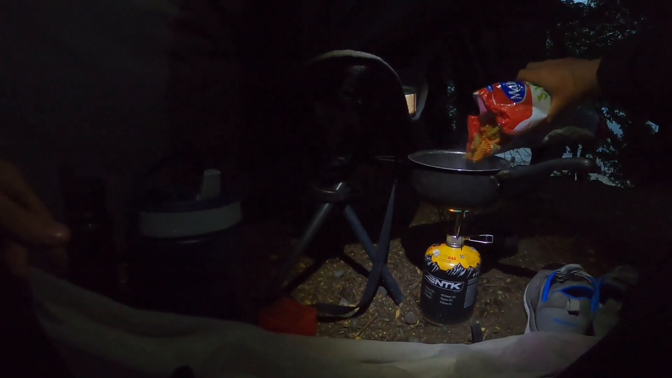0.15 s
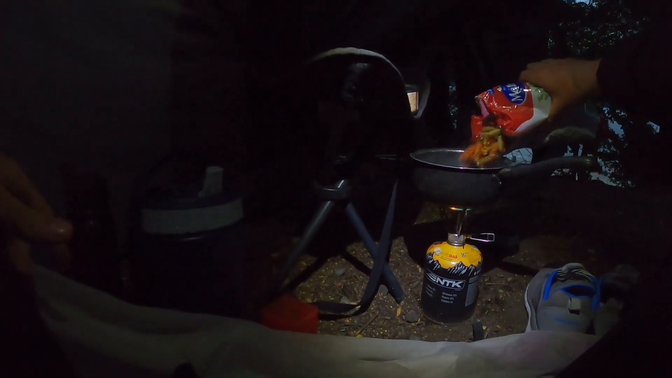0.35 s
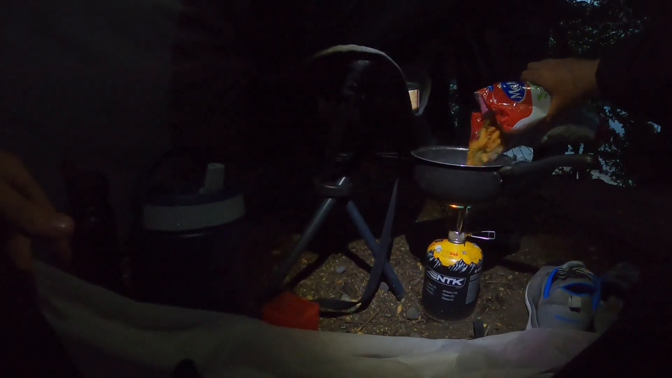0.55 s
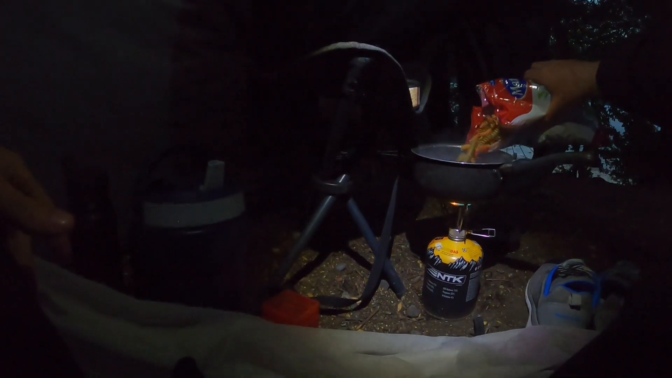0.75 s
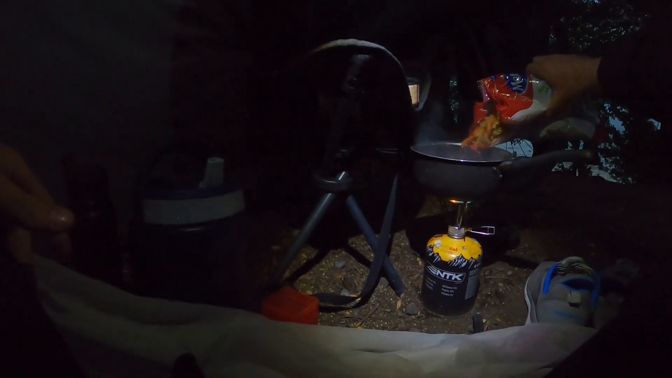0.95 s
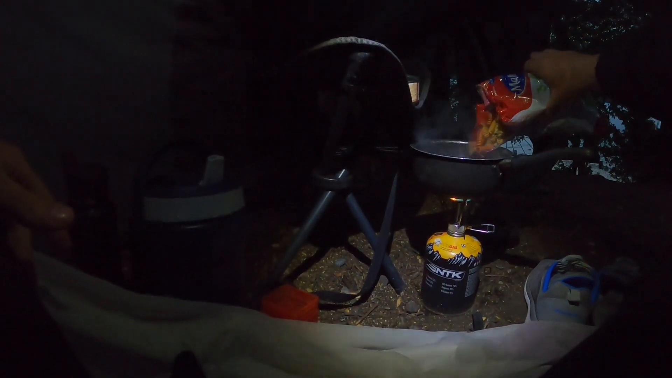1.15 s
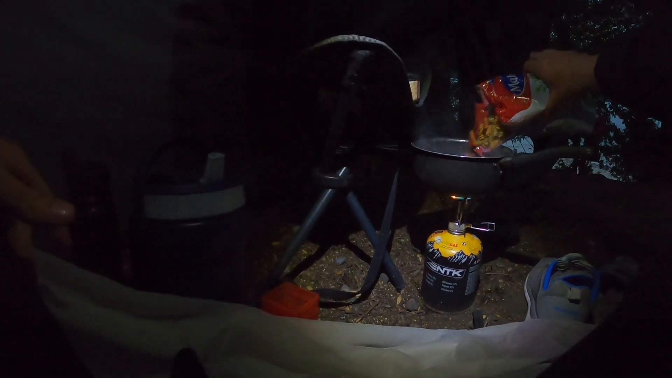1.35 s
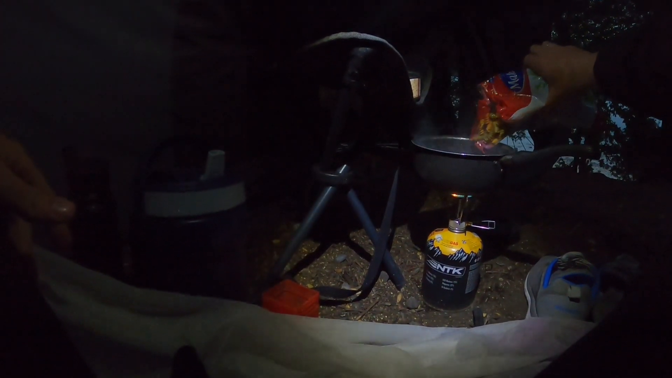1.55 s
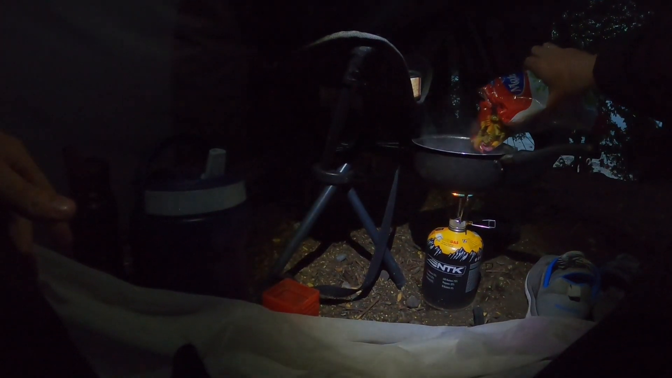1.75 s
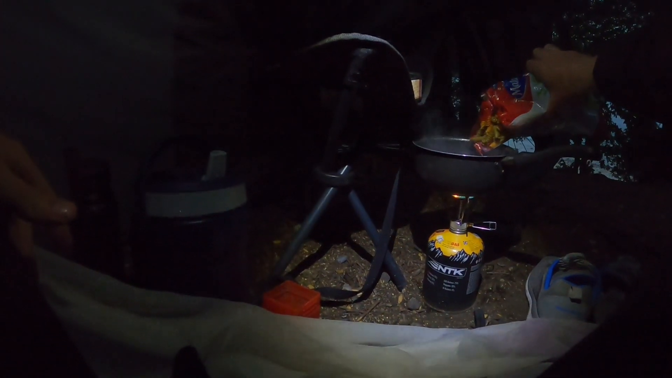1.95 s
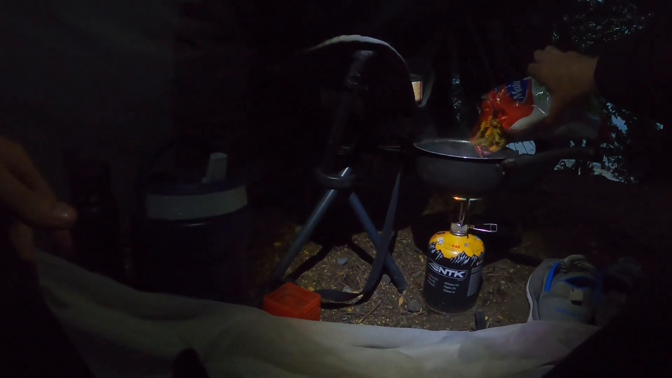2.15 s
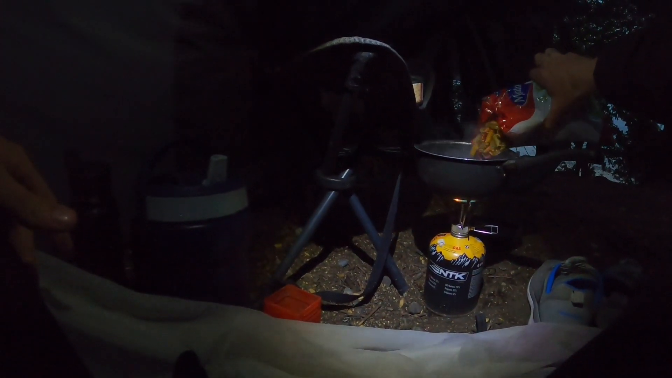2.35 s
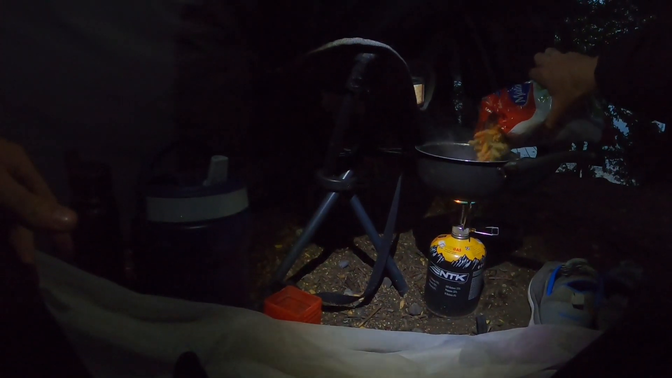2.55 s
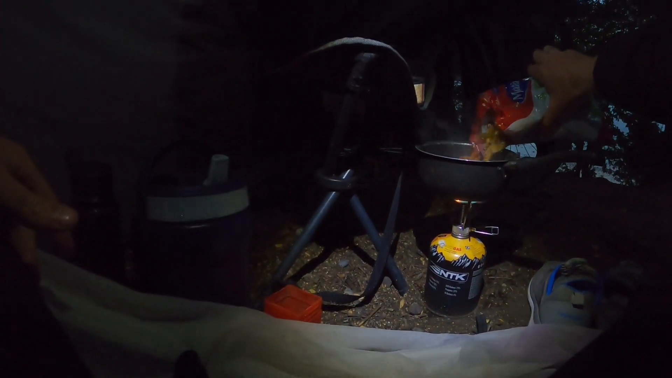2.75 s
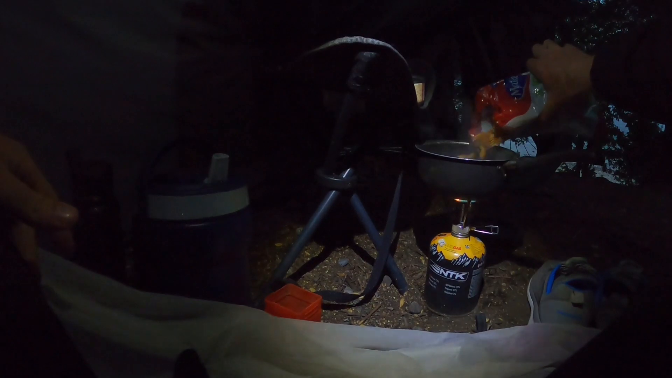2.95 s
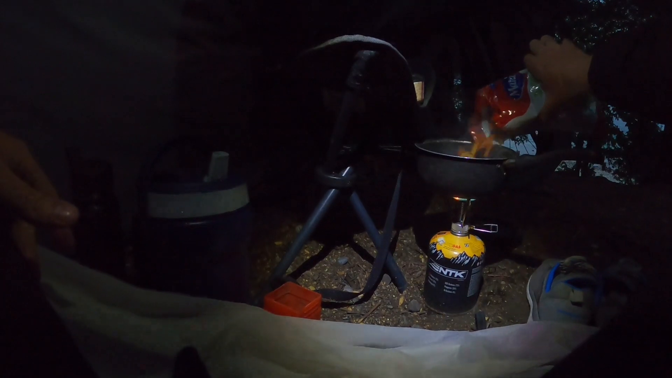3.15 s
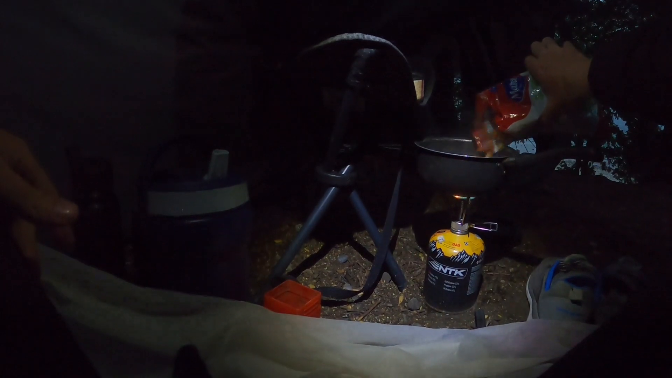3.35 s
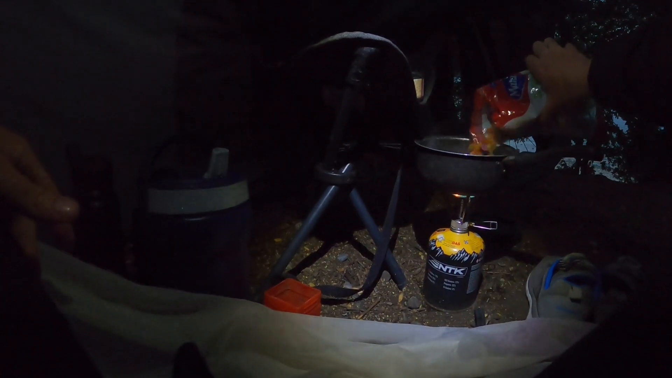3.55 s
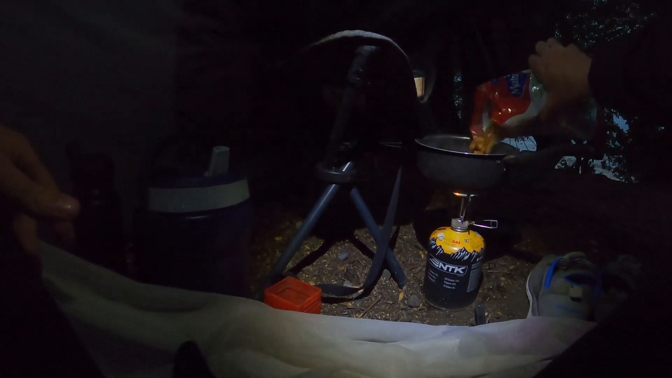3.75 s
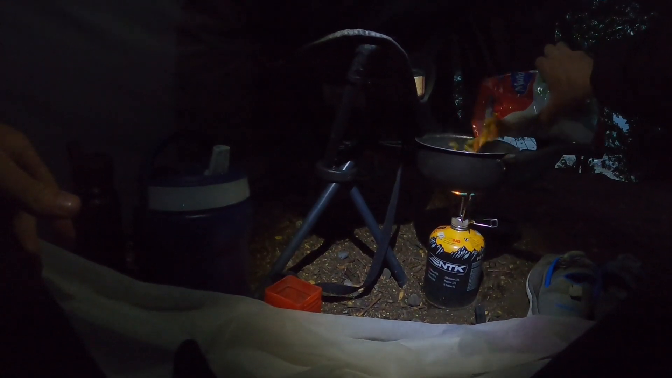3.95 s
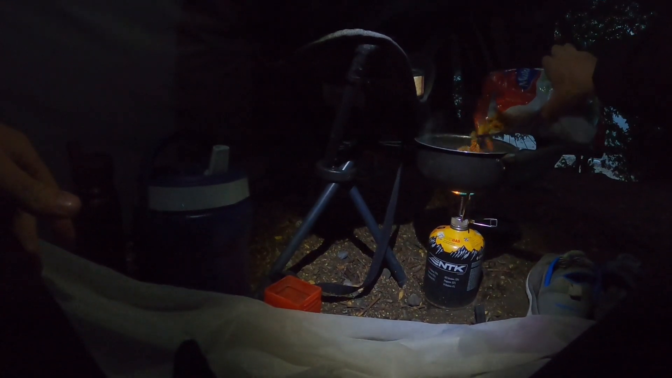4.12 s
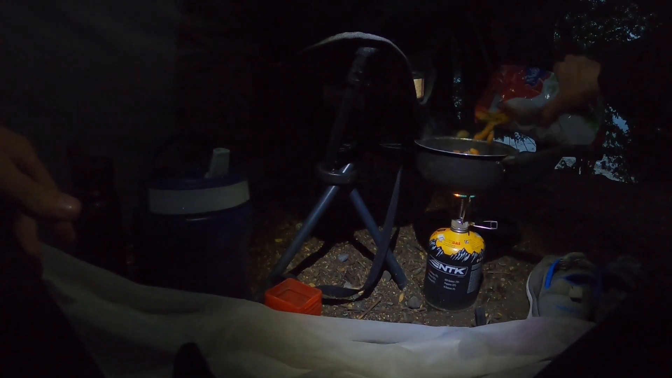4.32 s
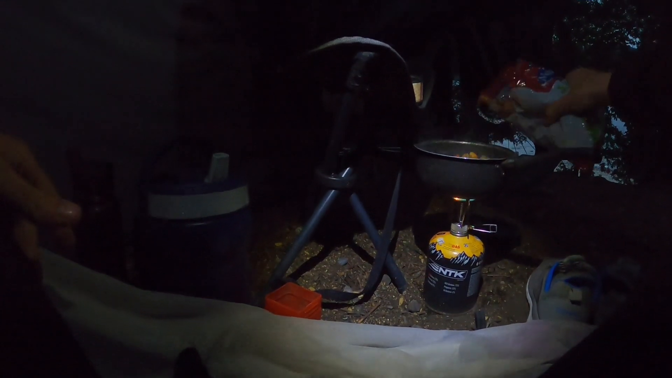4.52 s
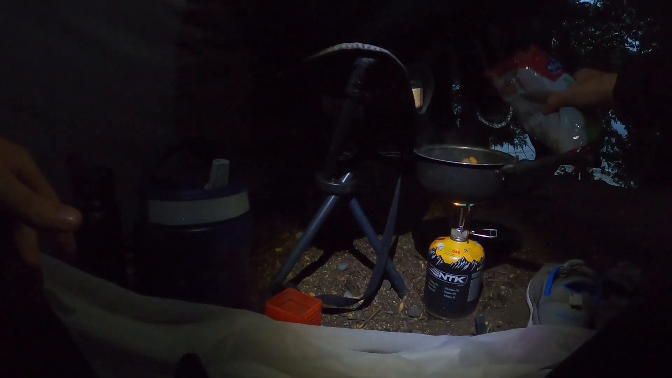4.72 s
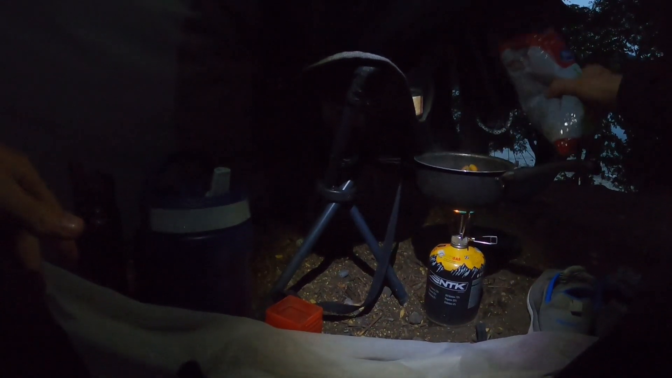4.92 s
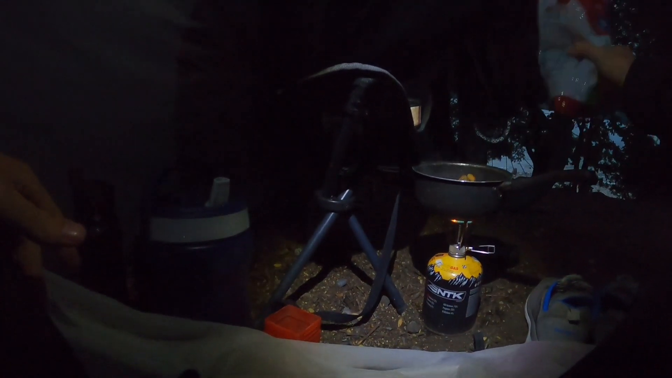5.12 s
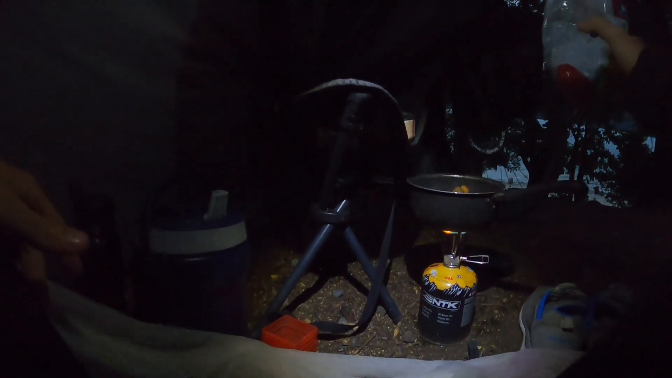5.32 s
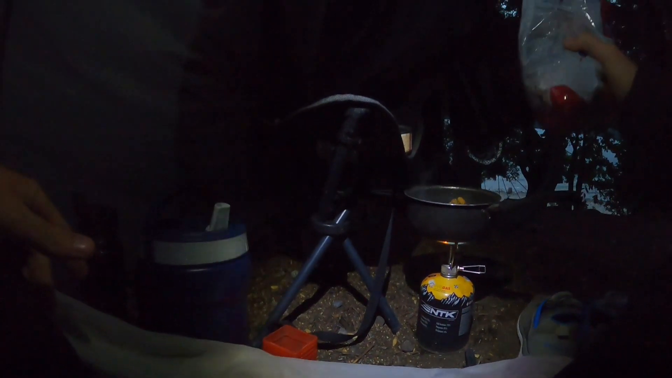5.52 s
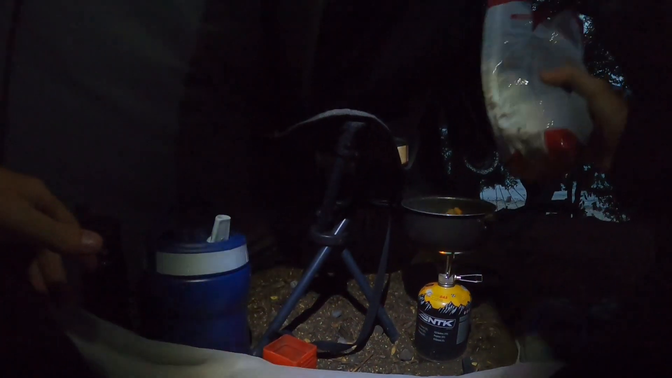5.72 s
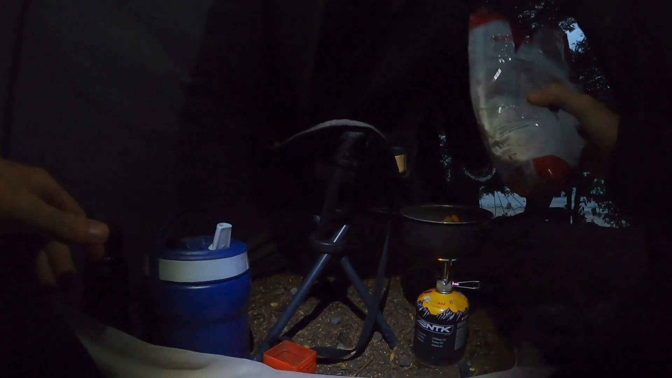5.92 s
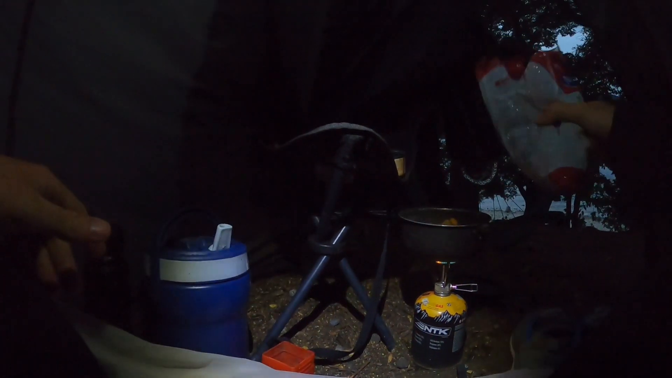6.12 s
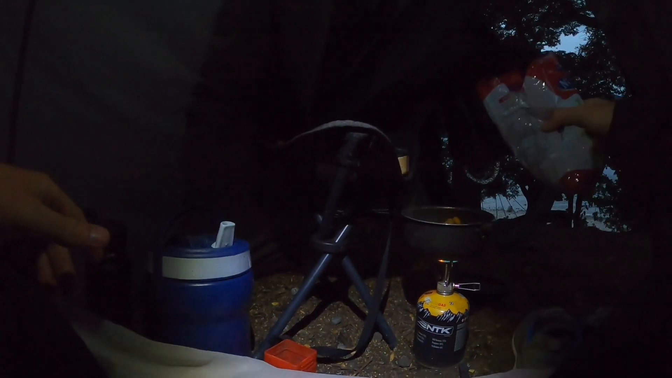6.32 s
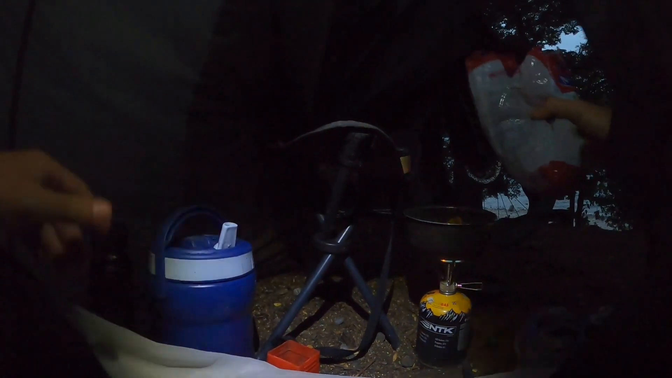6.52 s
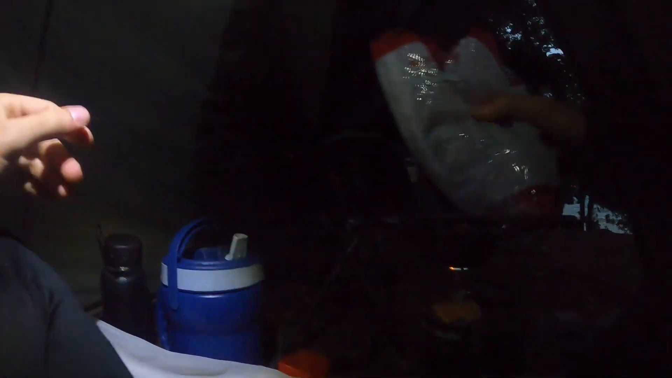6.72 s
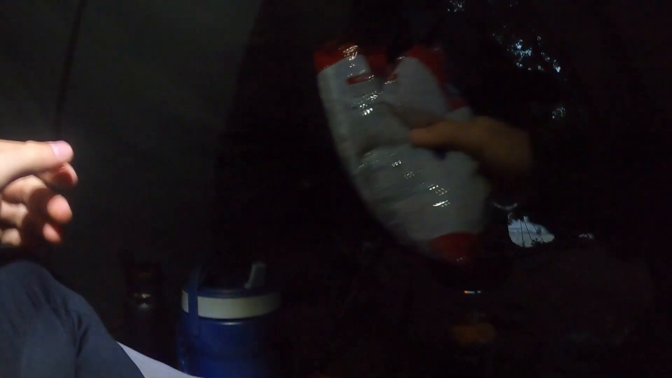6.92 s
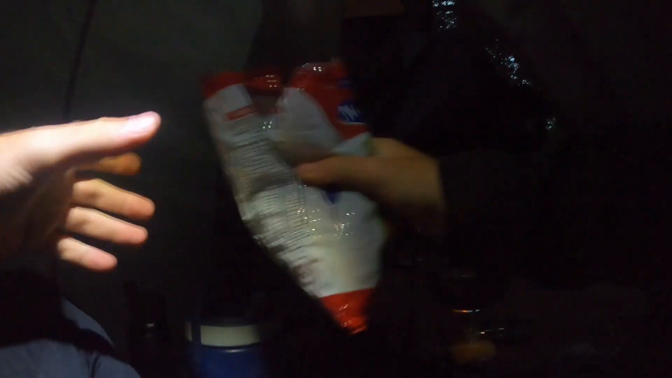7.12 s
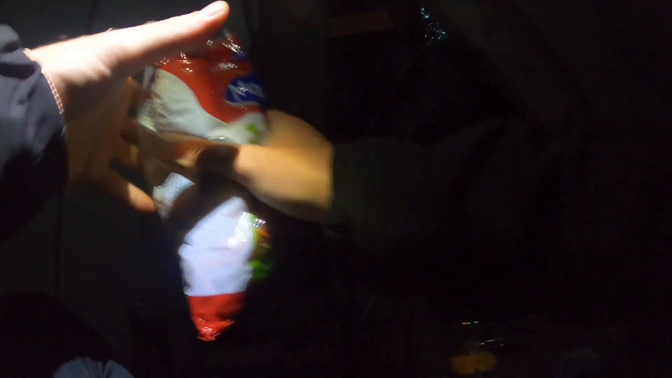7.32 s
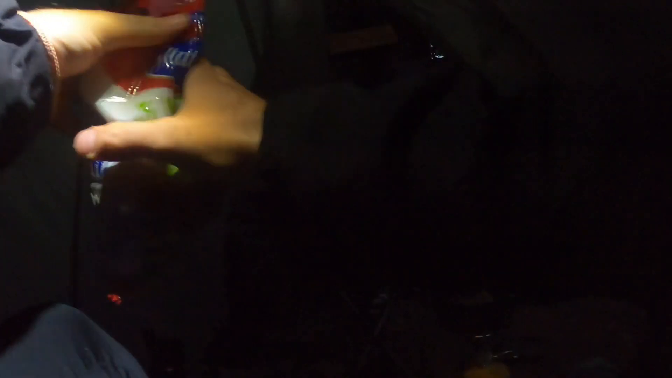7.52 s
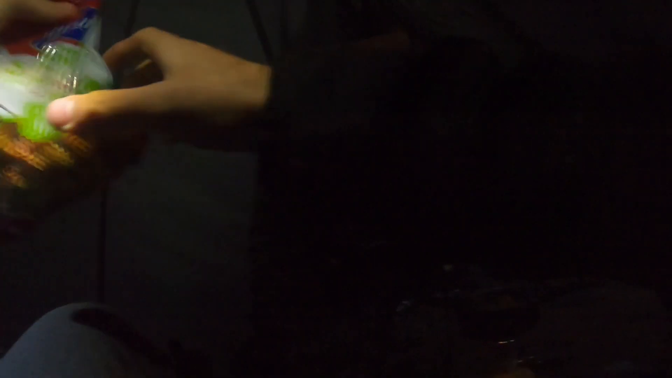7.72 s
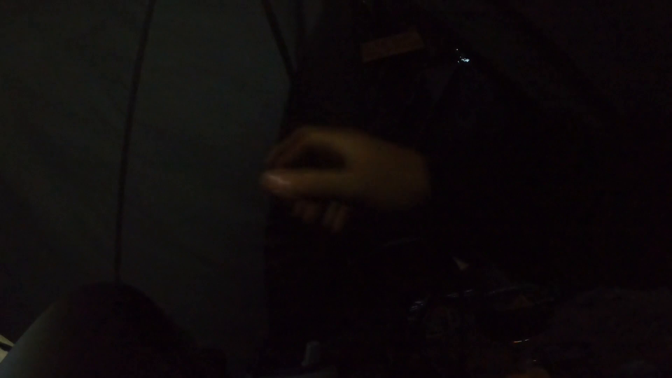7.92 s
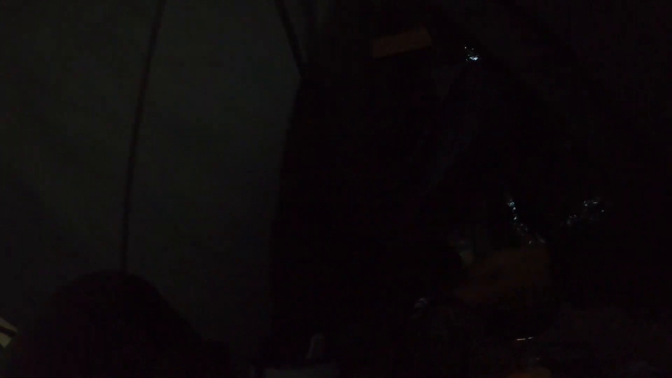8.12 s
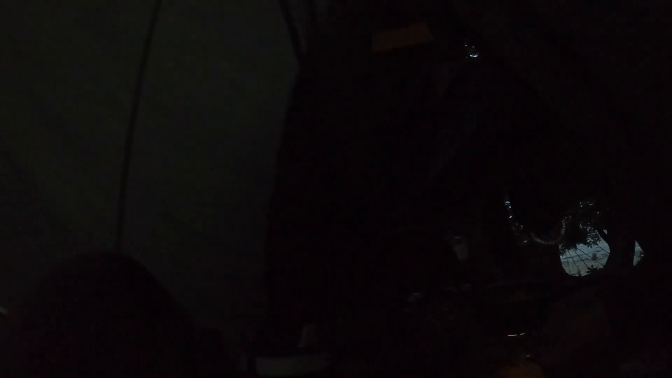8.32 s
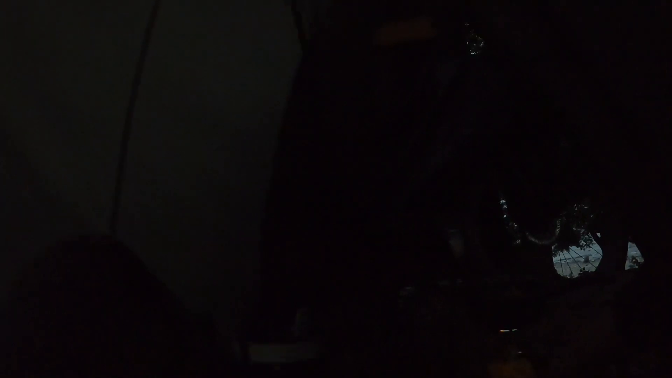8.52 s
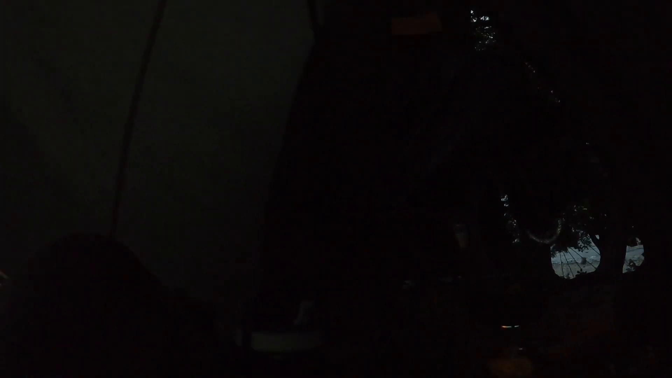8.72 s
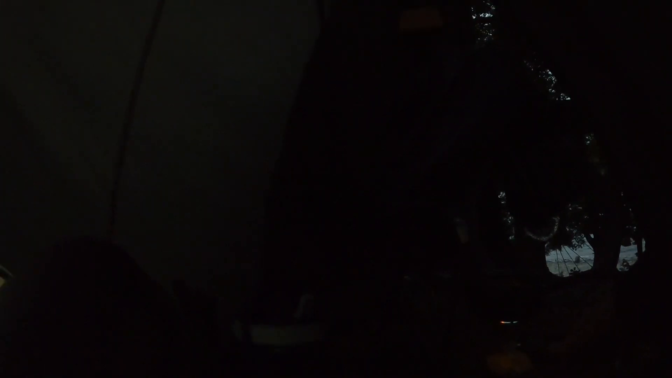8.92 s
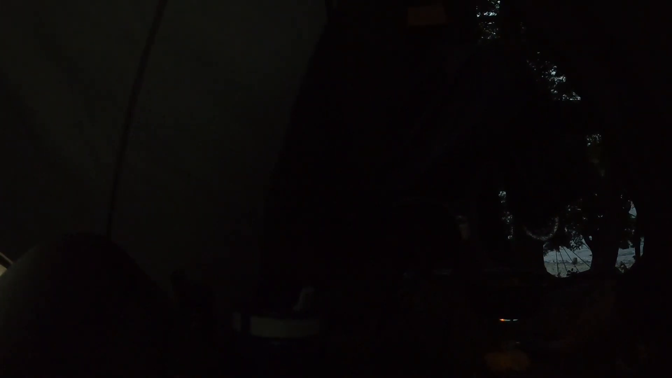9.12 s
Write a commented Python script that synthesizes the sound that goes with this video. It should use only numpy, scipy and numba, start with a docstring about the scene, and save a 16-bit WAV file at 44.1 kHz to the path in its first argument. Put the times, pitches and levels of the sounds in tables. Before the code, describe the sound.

Close crinkling of a stiff plastic bag as dry pasta rattles into a pot over a faint gas burner, then a loud crumple and drag.

```python
"""Dry pasta shaken from a bag, inside a tent

Close by, a hand shakes dry pasta from a stiff plastic bag into a pot, over a softly roaring gas stove.
The two ports of a head-worn camera hear the bag pass from right to left; tent cloth returns a short blur.
Film, pasta and knocks are clouds of short damped sines; the burner and the tent blur are shaped noise."""
import sys
import numpy as np
from scipy import signal
from scipy.fft import rfft, irfft, next_fast_len
from scipy.io import wavfile
from scipy.ndimage import uniform_filter1d
from numba import njit

SR = 44100
rng = np.random.default_rng(int(sys.argv[2]) if len(sys.argv) > 2 else 0)


def dump_mix(stems):
    """Bounce the given channels to the path in sys.argv[1] as a 16-bit WAV at rate SR."""
    frames = np.atleast_2d(stems).T  # one column per channel
    limited = np.clip(frames, -1, 1)  # hard clip at full scale
    pcm = np.round(limited * 32767).astype(np.int16)
    wavfile.write(sys.argv[1], SR, pcm)


N = 408793

# Spectrum of the gas flame. Each row: frequency in Hz, relative density in dB.
BURNER_SPECTRUM = [(22, -47), (50, -11), (100, -15.5), (190, 2), (350, -11.5), (600, -20), (1270, -7),
                   (4000, -32.5), (16000, -65)]
BURNER_DB = -49  # RMS level at the ports

# How the hand works the bag. Each row: time in seconds, base level of the rustle in dB,
# base level of pasta thudding in bag and pot in dB, share of the rustle that is smooth sliding (0-1).
HANDLING = [(0, -38, -43, 0.45), (.25, -43, -46, 0.35), (.52, -33, -38, 0.73), (.75, -37, -48.5, 0.65),
            (1.5, -48.5, -50, 0.36), (2.3, -44, -46.5, 0.02), (2.72, -37.5, -46, 0.9),
            (3.05, -43.5, -48.5, 0.27), (3.37, -39.5, -39, 0.5), (3.85, -38, -36, 0.61),
            (4.35, -44, -49.5, 0.56), (4.8, -54, -55.5, 0.55), (5.4, -37, -37, 0.69),
            (5.6, -47, -50.5, 0.34), (5.85, -49, -49, 0.3), (6.2, -47, -47.5, 0.1), (6.52, -55, -62, 0.27),
            (6.8, -42, -45, 1), (7.2, -39, -43.5, 0.74), (7.6, -32.5, -24.5, 0.62),
            (7.95, -38.5, -51, 0.42), (8.25, -43.5, -50, 0.34), (8.77, -42.5, -54.5, 0.44),
            (9.05, -47, -43, 0.78), (9.27, -47.5, -46.5, 0.7)]

# Place of the bag. Each row: time in seconds, left minus right in dB, lag of left behind right in ms.
BAG_PLACE = [(0, -2.5, 0.041), (6.3, -2, 0.045), (7.2, -2, 0.029), (8.2, 3.5, 0.0033), (8.7, 7, 0.0089),
             (9.27, 2, 0.0079)]

# Colour of the microphone ports. Each row: frequency in Hz, gain in dB.
MIC_COLOUR = [(180, -26), (300, 0), (398, -5.5), (678, -9), (1170, -2.5), (2210, -6), (3130, -5.5),
              (4230, -1.5), (4910, -11), (7570, -15), (8940, -23.5), (12100, -26.5), (16000, -42)]

# How the two ports differ. Each row: frequency in Hz, left minus right in dB.
PORT_DIFFERENCE = [(400, 0), (1300, 2), (2400, 2), (4400, 4.5), (6500, -10), (8500, -7.5), (15000, -2.5)]

# Dense ticks of one pitch as pasta streams out and, at the end, as the bag is dragged.
# Each row: time in seconds, ring in Hz, level against the rustle in dB, spread of pitch in octaves.
PASTA_TICKS = [(.4, 1770, -1, 0.11), (1.2, 1757, 1, 0.13), (2.8, 1730, -11, 0.13), (4.3, 1710, -6, .15),
               (8.849, 2900, -9, 0.72), (8.97, 3000, 5, .75)]

# Loud creases. Each row: time in seconds, nominal peak in dB, main ring in Hz,
# nominal treble against the peak in dB.
LOUD_CREASES = [(0.048, -22, 1700, -6), (0.055, -10, 4200, -15), (0.17, -15, 3360, -15),
                (0.181, -21, 770, -8), (0.219, -17, 4370, -13), (0.285, -9, 3970, -18),
                (0.46, -18, 4200, -19), (0.612, -17, 4100, -16), (0.9, -21, 4100, -10),
                (1.019, -23, 570, -19), (1.052, -20, 590, -16.5), (1.18, -17.5, 4260, -5.5),
                (1.299, -23.5, 1860, -10), (1.474, -23, 4100, -17), (1.546, -22.5, 1340, -20),
                (1.594, -16, 1160, -8), (1.653, -21.5, 1730, -33), (1.679, -24.5, 4070, -11),
                (1.818, -24, 3640, -16), (1.84, -16.5, 3730, -29), (1.848, -20.5, 3770, -15),
                (1.883, -24.5, 3800, -4), (1.899, -15.5, 3700, -12.5), (1.967, -16, 4160, -19),
                (2.026, -22.5, 1370, -4.5), (2.05, -15.5, 3860, -18), (2.064, -22.5, 1840, -6.5),
                (2.12, -21, 1570, -6.5), (2.14, -11, 3930, -13), (2.195, -22.5, 4000, -11),
                (2.213, -12, 1160, -16), (2.281, -18.5, 1070, -16), (2.291, -19, 4310, -13),
                (2.338, -25.5, 3750, -13), (2.35, -22, 4470, -17), (2.396, -22, 1050, -21),
                (2.603, -26, 3860, -29), (3.364, -18, 3980, -12), (3.454, -17, 1270, -13),
                (3.499, -22, 3780, -15), (3.568, -20.5, 1120, -25), (3.752, -16.5, 3760, -21),
                (3.799, -20, 1230, -14), (4.049, -21.5, 3830, -19), (4.159, -19, 3770, -14.5),
                (4.405, -24, 1360, -13), (4.41, -22.5, 4200, -6), (4.451, -25.5, 3940, -4.5),
                (4.684, -27, 1620, -41), (4.73, -28.5, 1400, -19), (4.799, -23, 1190, -8.5),
                (4.873, -18.5, 3230, -16.5), (5.009, -25.5, 1290, -11), (5.177, -19, 4110, -15),
                (5.184, -16.5, 4230, -18), (5.295, -21.5, 1680, -23), (5.37, -19.5, 1580, -17),
                (5.439, -17, 4140, -17), (5.53, -17.5, 1280, -13), (5.653, -17.5, 1770, -34),
                (5.768, -30.5, 3500, -6), (5.817, -28.5, 1400, -20), (5.89, -26, 3000, -17),
                (5.901, -14.5, 3180, -11.5), (5.937, -16, 3100, -10.5), (5.969, -24, 3000, -16),
                (5.975, -27.5, 7100, -8), (6.033, -11, 1240, -24), (6.05, -21, 1210, -11),
                (6.108, -28, 2990, -15), (6.138, -23, 4000, -15), (6.148, -26, 1730, -8),
                (6.172, -14.5, 1270, -13), (6.191, -27, 960, -13), (6.209, -18.5, 3840, -12),
                (6.217, -25, 2170, -22), (6.239, -20, 1620, -8.5), (6.265, -17.5, 960, -24),
                (6.288, -22.5, 3260, -16), (6.328, -20, 1010, -19), (6.349, -23, 4430, -19),
                (6.403, -31, 3820, -31), (6.431, -25.5, 3980, -12), (6.457, -30.5, 6450, -14),
                (6.472, -23.5, 1590, -16), (6.52, -32.5, 470, -27), (6.572, -26.5, 1270, -17),
                (6.605, -25, 1500, -14), (6.626, -25, 4000, -15), (6.654, -26, 1470, -5),
                (6.67, -19.5, 1280, -18), (6.74, -30, 1510, -14), (6.878, -26, 4000, -16),
                (7.135, -23, 1250, -20), (7.167, -22, 4130, -11), (7.226, -14, 3740, -9),
                (7.26, -12.5, 1180, -11), (7.273, -12, 4420, -20), (7.296, -17, 1400, -25),
                (7.328, -10.5, 1110, -21), (7.351, -11.5, 970, -20), (7.359, -15, 2200, -16),
                (7.38, -11, 3020, -11), (7.397, -12.5, 2870, -10), (7.466, -14, 3770, -11),
                (7.482, -15, 990, -13), (7.496, -13.5, 3930, -8.5), (7.532, -13, 1140, -14),
                (7.544, -18, 4300, -12), (7.56, -19, 4440, -7), (7.606, -11.5, 3060, -10),
                (7.621, -16.5, 1550, -7), (7.697, -17.5, 865, -7.5), (7.706, -11.5, 1740, -17),
                (7.75, -21, 3800, 2), (7.773, -13.5, 2380, -6), (7.997, -18, 1970, -18),
                (8.026, -19, 3900, -12), (8.098, -20, 3900, -12), (8.157, -20.5, 3850, -10.5),
                (8.187, -22.5, 4030, -1), (8.218, -15, 3820, -8), (8.276, -16, 3740, -13.5),
                (8.374, -15.5, 4260, -9.5), (8.392, -22, 1400, -11), (8.41, -18, 1410, -11),
                (8.425, -21.5, 3960, -10), (8.444, -21, 4000, -9), (8.597, -24, 1650, -24),
                (8.629, -19, 1380, -30), (8.69, -21.5, 2090, -20), (8.714, -22.5, 1630, -22),
                (8.86, -19.5, 2240, -12), (8.882, -21, 4300, -7), (8.908, -23, 2000, -9),
                (8.924, -13.5, 2210, -11)]

# Stretches of louder crushing or dragging rustle, each ending abruptly.
# Each row: start in seconds, length in seconds, base level of the rustle in dB.
CRUSH_STRETCHES = [(1.895, 0.077, -37), (7.313, 0.1, -26), (7.463, 0.26, -26), (7.733, 0.066, -28),
                   (7.814, 0.086, -32), (8.159, 0.08, -33.5), (8.263, 0.054, -33), (8.379, 0.074, -34),
                   (8.514, 0.22, -43.5), (8.842, 0.074, -34.5), (8.927, 0.243, -32.5)]

# Knocks on the camera housing. Each row: time in seconds, nominal peak in dB,
# pitch in Hz, left minus right in dB.
HOUSING_KNOCKS = [(8.42, -28, 36.2, 16), (8.54, -30.5, 36.6, 18)]

# Flurry of small creases around each loud one: level against its nominal peak, build-up and fade
FLURRY_DB, FLURRY_RISE_S, FLURRY_FADE_S = -22, 0.0028, 0.011
CRUSH_ATTACK_S, CRUSH_RELEASE_S = 0.013, 0.004
TENT_T60_S, TENT_DB = 0.018, -6  # decay of the blur; its energy against the bag's direct sound
TENT_TURNS_PER_S = 0.7  # how often the blur cycles through its two patterns
TOP_HZ = 16300


def undb(db):
    """Turns dB into an amplitude factor."""
    return 10 ** (np.asarray(db) / 20)


def level(x, db):
    """Scales a sound to an RMS level in dB."""
    return x * undb(db) / np.sqrt(np.mean(x ** 2))


def spectrum_db(table, hz):
    """Reads (Hz, dB) points on a log-frequency axis."""
    f, db = np.transpose(table)
    return np.interp(np.log(np.maximum(hz, 1)), np.log(f), db)


def curve(table):
    """Reads (s, value) rows at every sample."""
    return np.interp(np.arange(N) / SR, *np.transpose(table))


def walk(per_s):
    """Random levels held 1 / per_s seconds and slewed once."""
    k = int(SR / per_s)
    steps = np.repeat(rng.standard_normal(N // k + 1), k)
    return uniform_filter1d(steps, size=k)[:N]


def colour(x, db):
    """Causal filter with gains db on 2049 even frequencies, from the folded cepstrum."""
    c = irfft(db * np.log(10) / 20)
    c[1:len(c) // 2] *= 2
    c[len(c) // 2 + 1:] = 0
    return signal.oaconvolve(x, irfft(np.exp(rfft(c))))[:N]


def through_ports(x):
    """Each port colours the sound at its microphone in its own way."""
    grid = np.linspace(0, SR / 2, 2049)
    shared, difference = spectrum_db(MIC_COLOUR, grid), spectrum_db(PORT_DIFFERENCE, grid)
    return np.array([colour(v, shared + side * difference / 2) for v, side in zip(x, (1, -1))])


@njit
def ring(start, hz, cycles, size, rise, n):
    """Damped sines that begin between samples, swell over a share of their length and fall 60 dB."""
    y = np.zeros(n)
    for k in range(len(start)):
        fall = hz[k] / SR * np.log(1000) / cycles[k]
        s = 2j * np.pi * hz[k] / SR - fall
        i = int(np.ceil(start[k]))
        z, p = size[k] * np.exp(s * (i - start[k])), np.exp(s)
        gap, q = np.exp(-fall / rise * (i - start[k])), np.exp(-fall / rise)
        for j in range(max(i, 0), min(n, i + int(cycles[k] * SR / hz[k]))):
            y[j] += z.imag * (1 - gap)
            z, gap = z * p, gap * q
    return y


def at_ports(s, hz, cycles, size, scatter_ms, scatter_db, rise=0.65):
    """Each grain reaches the two ports from the bag's place, give or take where on the bag it sits."""
    t, pan_db, lag_ms = np.transpose(BAG_PLACE)
    pan = undb((np.interp(s, t, pan_db) + scatter_db) / 2)
    half_lag_s = (np.interp(s, t, lag_ms) + scatter_ms) / 2000
    return np.array([ring((s + side * half_lag_s) * SR, hz, cycles, size * pan ** side, rise, N)
                     for side in (1, -1)])


def crackle(per_s, count, spread_db, lo_hz, hi_hz, cycles, spill_ms):
    """Random buckling: some bigger creases among many small, each ringing count patches of film."""
    rows = int(per_s * N / SR)
    once, each = rng.random((rows, 2)), rng.random((rows, count, 5))
    hz = lo_hz * (hi_hz / lo_hz) ** each[..., 0]
    s = once[:, :1] * N / SR + spill_ms / 1000 * each[..., 1] ** 2
    force = np.minimum(-np.log(1 - once[:, 1:]), 3.0)
    size = undb(spread_db * force) * hz * (2 * each[..., 2] - 1)
    scatter_ms, scatter_db = .09 * (each[..., 3] - .5), 4 * (each[..., 4] - .5)
    grains = s, hz, np.full(s.shape, 1. * cycles), size, scatter_ms, scatter_db
    return at_ports(*(v.ravel() for v in grains))


def burner():
    """The gas flame roars and flutters: shaped noise whose bass is nearly alike at both ports."""
    n = next_fast_len(N, True)
    hz = np.arange(n // 2 + 1) * SR / n
    mid, side = rfft(rng.standard_normal((2, n))) * undb(spectrum_db(BURNER_SPECTRUM, hz))
    side = side * np.clip(hz / 3000, .12, 1)
    roar = irfft([mid + side, mid - side], n)[:, :N]
    flutter = undb(2.3 * walk(22))
    return level(roar * flutter, BURNER_DB)


def film_rustle(share):
    """Small creases blend with smooth sliding as share rises from 0 to 1, by power."""
    creases = through_ports(
        crackle(200, count=14, spread_db=3.5, lo_hz=500.0, hi_hz=16260, cycles=14.8, spill_ms=4))
    sliding = through_ports(
        crackle(3000, count=2, spread_db=5.0, lo_hz=497, hi_hz=6160, cycles=8.1, spill_ms=1.503))
    # skin and cloth brushing the film add a fine, even hiss on top
    hiss = through_ports(
        crackle(14000, count=1, spread_db=2.0, lo_hz=3550, hi_hz=15900, cycles=10.0, spill_ms=0))
    sliding = level(sliding, -1.7) + level(hiss, -6.5)
    film = np.sqrt(1 - share) * level(creases, 0) + np.sqrt(share) * level(sliding, 0)
    # the rustle's dull and bright parts flicker at random, each by itself
    dull = signal.sosfilt(signal.butter(1, 2600, fs=SR, output="sos"), film)
    bright = film - dull
    return dull * undb(2.3 * walk(14)) + bright * undb(2.6 * walk(14))


def pasta_thuds():
    """Pasta thuds in bag and pot as low damped rings, over a rumble of the housing."""
    thuds = crackle(350, count=3, spread_db=2.0, lo_hz=135.4, hi_hz=402, cycles=6.65, spill_ms=7.8)
    # a small bag radiates no deep bass
    thuds = signal.sosfilt(signal.butter(1, 130, "high", fs=SR, output="sos"), thuds)
    # moving arms shake the head-worn housing with a deep rumble
    rumble = crackle(120, count=1, spread_db=3.5, lo_hz=35.2, hi_hz=111, cycles=5.0, spill_ms=0)
    return level(level(thuds, 0) + level(rumble, -16.0), 0)


def ticks():
    """Hard little pieces knock together and ring close to one pitch and its overtone; at the end, cloth rubbing
    on the bag rings near 3 kHz the same way."""
    chance = rng.random((int(1500 * N / SR), 6)).T
    t, ring_hz, db, octaves = np.transpose(PASTA_TICKS)
    s = chance[0] * N / SR
    mode = np.where(chance[5] < .5, 1, 2.25)  # fundamental or overtone
    detune = 2 ** (np.interp(s, t, octaves) * (chance[1] - .5))
    hz = np.interp(s, t, ring_hz) * mode * detune
    size = undb(np.minimum(-3.0 * np.log(1 - chance[2]), 9))
    scatter_ms, scatter_db = .06 * (chance[3] - .5), 3 * (chance[4] - .5)
    sound = at_ports(s, hz, 17.6 * mode, size, scatter_ms, scatter_db)
    return undb(curve(np.transpose([t, db]))) * level(sound, 0)


def flurries():
    """Power of the small creases that gather before each loud one and die away after it."""
    s, peak_db = np.transpose(LOUD_CREASES)[:2]
    kicks = np.bincount((s * SR).astype(int), undb(peak_db + FLURRY_DB) ** 2, N)
    age = np.arange(-8192, 8193) / SR
    shape = np.exp(np.where(age < 0, age / FLURRY_RISE_S, -age / FLURRY_FADE_S))
    return np.maximum(signal.oaconvolve(kicks, shape, "same"), 0)


def snaps():
    """A loud crease rings one patch hardest; patches of other sizes follow within milliseconds."""
    s, peak_db, main_hz, treble_db = np.transpose(LOUD_CREASES)[..., None]
    chance = rng.random((len(LOUD_CREASES), 25, 6))
    kind = np.repeat([0, 1, 2], [1, 12, 12])  # main ring, neighbours, treble
    hz = np.choose(kind, [main_hz, 600 * 7.94 ** chance[..., 0], 4800 * 3.28 ** chance[..., 0]])
    # neighbours weaken with their distance in octaves from the main ring
    near_db = 1.5 - 3.0 * np.abs(np.log2(hz / main_hz)) - 9.0 * chance[..., 1]
    # offset the ports' shared colour at the main ring
    db = peak_db - spectrum_db(MIC_COLOUR, main_hz) + np.choose(kind, [6.5, near_db, treble_db + 14.0])
    late_s = np.choose(kind, [0, .003, .002]) * chance[..., 2] ** 3
    cycles = 0.0038 * hz + 1.0
    size = undb(db) * np.sign(chance[..., 3] - .5)
    scatter_ms, scatter_db = .05 * (chance[..., 4] - .5), 3 * (chance[..., 5] - .5)
    grains = s + late_s, hz, cycles, size, scatter_ms, scatter_db
    return at_ports(*(v.ravel() for v in grains), rise=0.29)


def crushes():
    """Power of the louder crushing or dragging rustle: quick attack, hold, abrupt end."""
    t = np.arange(N) / SR
    power = np.zeros(N)
    for s, held, db in CRUSH_STRETCHES:
        corners = [0, CRUSH_ATTACK_S, held, held + CRUSH_RELEASE_S]
        power += undb(db) ** 2 * np.interp(t - s, corners, [0, 1, 1, 0])
    return power


def knocks():
    """Slow one-sided thumps carried through the housing."""
    s, db, hz, pan_db = np.transpose(HOUSING_KNOCKS)
    cycles = np.full(len(s), 5.)
    return np.array([ring(s * SR, 1. * hz, cycles, undb(db + side * pan_db / 2), 0.37, N)
                     for side in (1, -1)])


def tent_blur(bag):
    """Tent cloth returns a short, shifting blur, unlike at each port and mostly of the treble."""
    age = np.arange(1, 4096) / SR
    # two decaying noise patterns for each port, silent for the first 1.5 ms
    blur = rng.standard_normal((2, 2, len(age))) * undb(-60 * age / TENT_T60_S) * (age > .0015)
    blur = signal.sosfilt(signal.butter(1, 900, "high", fs=SR, output="sos"), blur)
    blur = level(blur, TENT_DB) / np.sqrt(len(age))
    # crossfade steadily, but with a wander, between the patterns and their inversions
    turn = 2 * np.pi * (TENT_TURNS_PER_S * np.arange(N) / SR + walk(3) / 4)
    weights = np.cos(turn), np.sin(turn)
    return sum(signal.oaconvolve(bag * w, b, axes=1)[:, :N] for w, b in zip(weights, blur))


def scene():
    """The hand drives the rustle, ticks and thuds; snaps, tent, knocks and burner join them."""
    t, *controls = np.transpose(HANDLING)
    rustle_db, thud_db, share = (curve(np.transpose([t, c])) for c in controls)
    share = np.clip(share, 0, 1)
    flurry = flurries()
    effort = np.sqrt(undb(rustle_db) ** 2 + flurry + crushes())
    # the contents move in jerks, so rustle and thuds clump together unless the bag slides
    jerks = undb(6.63 * (1 - share) * np.minimum(walk(60), 1))
    # creases jolt the contents, so the thuds swell with the flurries
    jolt = (1 + flurry / undb(rustle_db) ** 2) ** 0.17
    rustle = effort * (film_rustle(share) + through_ports(ticks()))
    thuds = jolt * undb(thud_db) * pasta_thuds()
    bag = jerks * (rustle + thuds) + through_ports(snaps())
    return bag + tent_blur(bag) + knocks() + burner()


def record(dry):
    """The camera cuts the top steeply."""
    return signal.sosfilt(signal.ellip(10, .2, 80, TOP_HZ, fs=SR, output="sos"), dry)


dry = scene()
out = record(dry)
dump_mix(out)
```